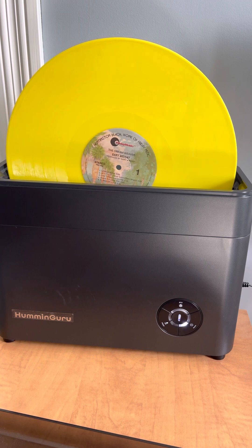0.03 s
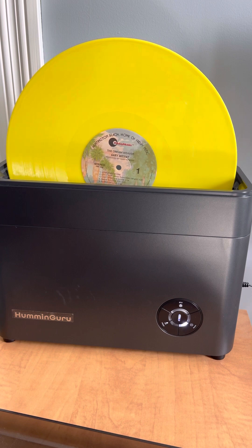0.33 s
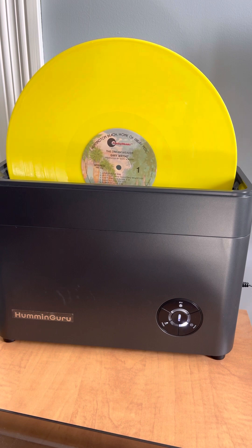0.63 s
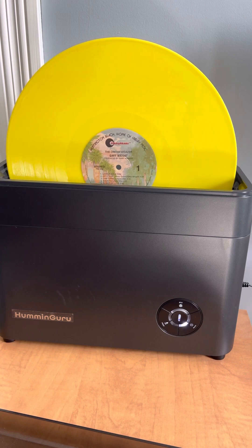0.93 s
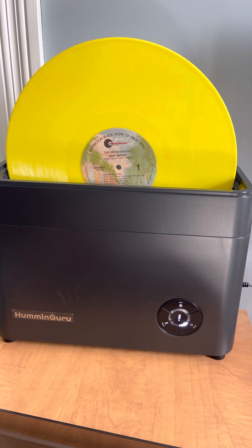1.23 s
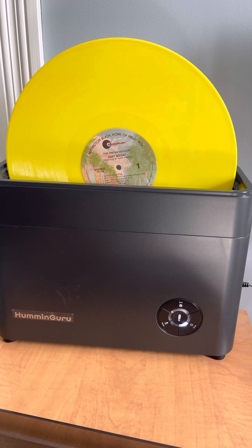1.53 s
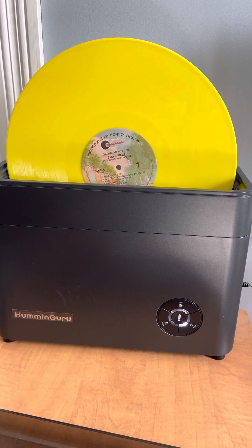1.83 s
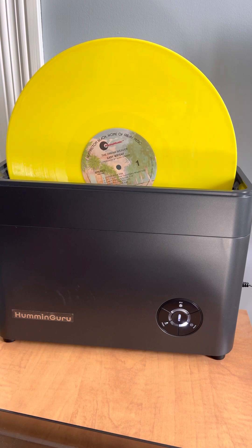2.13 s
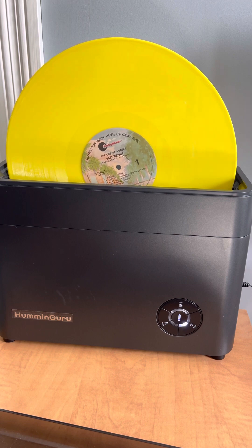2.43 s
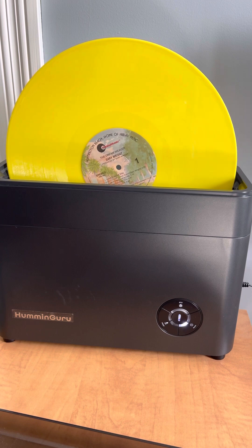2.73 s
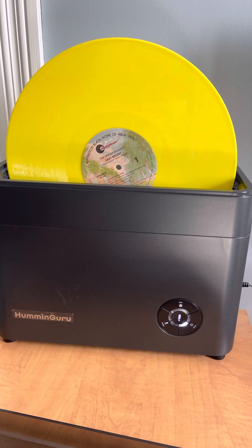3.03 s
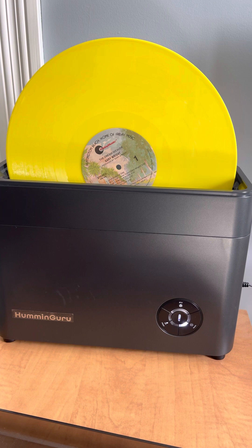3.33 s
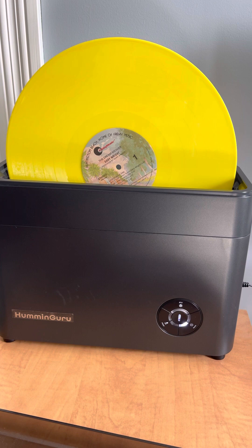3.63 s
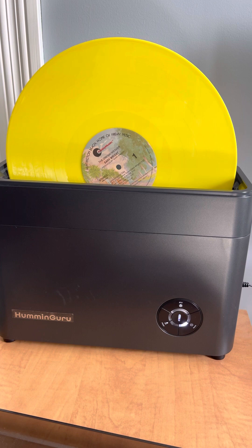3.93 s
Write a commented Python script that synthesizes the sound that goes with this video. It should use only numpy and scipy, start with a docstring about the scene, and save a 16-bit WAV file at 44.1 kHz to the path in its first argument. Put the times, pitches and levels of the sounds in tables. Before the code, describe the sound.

An ultrasonic record cleaner hisses and sizzles over a faint motor hum.

```python
"""Cavitation in the water bath of an ultrasonic record cleaner, close to two microphones in a quiet room.
Collapsing bubbles hiss and break into spells of sizzling that ring the tank, with one bright spit.
The stirred water gurgles faintly. A small motor hums at a slightly wavering speed
over a soft rush of air through the housing."""
import sys
import numpy as np
from scipy import signal
from scipy.fft import rfft, irfft
from scipy.io import wavfile

SR = 44100
rng = np.random.default_rng(int(sys.argv[2]) if len(sys.argv) > 2 else 0)


def digitize_waveform(pressure):
    """Quantize a signal to 16-bit integers and store it at the path in sys.argv[1].

    Rows of a 2-D input are taken as channels; values are limited to [-1, 1].
    """
    field = np.atleast_2d(pressure).T
    bounded = np.clip(field, -1, 1)
    quanta = np.round(bounded * 32767).astype(np.int16)
    wavfile.write(sys.argv[1], SR, quanta)


N = 176400
TIME_S = np.arange(N) / SR
FREQ_HZ = np.fft.rfftfreq(N, 1 / SR)


# Cavitation spectrum: f/Hz, relative level/dB
HISS_SPECTRUM = [(2000, -125), (4000, -106), (4900, -94), (5600, -88.3), (6500, -89), (7300, -86.5),
                 (8000, -84), (8500, -83), (8900, -81), (9300, -80), (10400, -76.3), (11000, -77.2),
                 (11700, -79), (12500, -82.3), (13300, -89), (14300, -97.5), (15000, -100), (15600, -95)]

def hiss(lift_db, level_db=-41, growth_db_per_s=.33, swell_db=.46):
    """A steady, slightly restless cloud of collapsing bubbles."""
    envelope_db = growth_db_per_s * TIME_S + swell_db * wander(rate_hz=24) + lulls()
    drive = collapses(per_s=28000) * amp(envelope_db)
    return amp(level_db) * radiate(drive, HISS_SPECTRUM, lift_db)


# Sizzling spells: start t/s, length/s, relative level/dB
SIZZLE_SPELLS = [(0.24, 0.12, 1.3), (0.47, 0.15, -2.2), (0.667, 0.016, 11), (0.69, 0.02, 4.2),
                 (0.735, 0.085, 0.8), (0.845, 0.02, 5.5), (0.885, 0.022, 3.2), (0.955, 0.027, 3.5),
                 (1.005, 0.032, 3.8), (1.135, 0.025, 2.8), (1.19, 0.065, 1.8), (1.275, 0.065, 3.6),
                 (1.39, 0.21, -1), (1.615, 0.06, 2), (1.722, 0.025, 2), (1.81, 0.14, 2), (2.165, 0.095, 1),
                 (2.29, 0.17, -.5), (2.69, 0.025, 0), (2.722, 0.03, 4.6), (2.84, 0.07, 2), (2.93, 0.11, 0),
                 (3.09, 0.23, .3), (3.45, 0.17, 1), (3.63, 0.18, -.4)]
# Sizzle spectrum: f/Hz, relative level/dB
SIZZLE_SPECTRUM = [(6000, -46), (7500, -23), (7950, -16), (8400, -16.5), (8570, -9), (8720, 0), (8900, 0),
                   (9100, -4), (9260, -9), (9450, -6), (9700, -11.5), (10500, -18), (12000, -29),
                   (14000, -44)]

def sizzle(lift_db, level_db=-43.9, idle_db=-11, attack_s=.008, release_s=.012):
    """Bubble clusters flare up, flutter and die away."""
    envelope = amp(idle_db + lulls())
    for start, length, db in SIZZLE_SPELLS:
        attack = np.clip((TIME_S - start) / attack_s + .5, 0, 1)
        release = np.exp(-np.maximum(TIME_S - start - length, 0) / release_s)
        envelope = np.maximum(envelope, amp(db) * attack * release)
    clicks = collapses(per_s=18000)
    flutter_db = 2.2 * np.clip(wander(rate_hz=70), -2, 1)
    return amp(level_db) * radiate(clicks * envelope * amp(flutter_db), SIZZLE_SPECTRUM, lift_db)


# Spit spectrum: f/Hz, relative level/dB
SPIT_SPECTRUM = [(7000, -40), (7900, -18), (8200, -3), (8600, 0), (9300, -4), (10300, -5), (11000, -14),
                 (13000, -40)]

def spit(centre_s=1.706, length_s=.034, level_db=-41, pulse_hz=115, pulse_depth=.3):
    """One bright bubble cluster bursts straight ahead in a few quick pulses."""
    t = TIME_S - centre_s
    pulses = 1 + pulse_depth * np.cos(2 * np.pi * pulse_hz * t)
    cluster = radiate(collapses(per_s=20000), SPIT_SPECTRUM, lift_db=0, aside=0)
    return amp(level_db) * bump(centre_s, length_s) * pulses * cluster


def collapses(per_s):
    """Two trains of clicks from collapsing bubbles, at the same instants with separate random strengths."""
    return rng.standard_normal((2, N)) * (rng.random(N) < per_s / SR)


# Cavitation lulls: centre t/s, length/s, gain/dB
CAVITATION_LULLS = [(.12, .2, -1), (1.09, .09, -2), (2.06, .07, -1.5), (3.385, .09, -2.6),
                    (3.92, .16, -1.6)]

def lulls():
    """Gain in dB as the cavitation briefly slackens."""
    return sum(db * bump(centre, length) for centre, length, db in CAVITATION_LULLS)


# Tank modes: f/Hz, lift/dB
TANK_MODES = [(8748, 6.5), (8840, 4.5), (9040, 3), (9130, 4), (9232, 3.5), (9485, 4.5), (9722, 7),
              (9925, 3), (10029, 3.5), (10172, 3), (10476, 3.5), (10637, 4.5), (10893, 5.5), (11027, 5.5),
              (11322, 3), (11535, 2.5), (11890, 4), (11989, 3), (12096, 2.5), (12190, 3), (12297, 3.5),
              (12543, 4.5)]

def tank():
    """Lift in dB from the ringing water tank."""
    return resonances(TANK_MODES, half_width_hz=24)


# Bubble families: f/Hz, spread/Hz, level/dB
BUBBLE_FAMILIES = [(1050, 86, -71), (1650, 82, -70), (2129, 190, -72)]

def water(chirp_db=-60.5):
    """Stirred water gurgles faintly, with one short chirp."""
    burble = sum(amp(db) * gurgles(hz, spread) for hz, spread, db in BUBBLE_FAMILIES)
    chirp = noise_band(centre_hz=1430, width_hz=270) * bump(centre_s=.095, length_s=.14)
    return burble + amp(chirp_db) * chirp


def gurgles(centre_hz, spread_hz, per_s=75, decay_s=.0055, rise_per_s=1.5, range_db=10):
    """Small bubbles ring near one pitch; each swells, glides up a little and dies."""
    t = np.arange(0, 8 * decay_s, 1 / SR)
    envelope = t * np.exp(-t / decay_s)
    glide = 1 + rise_per_s * (t - decay_s)
    bubbles = np.zeros(N + len(t))
    for when, pitch, faintness in rng.random((round(per_s * N / SR), 3)):
        ring_hz = centre_hz + spread_hz * np.log((pitch + .01) / (1.01 - pitch)) / 2  # logistic scatter
        ring = np.sin(2 * np.pi * np.cumsum(ring_hz * glide) / SR)
        start = int(when * N)
        bubbles[start:start + len(t)] += amp(-range_db * faintness) * envelope * ring
    return unit_rms(bubbles[:N])


# Main motor tone: t/s, f/Hz
MOTOR_PITCH = [(0, 691.2), (0.2, 692.9), (0.35, 692.1), (0.55, 694.4), (0.7, 692.9), (0.95, 688.3),
               (1.05, 690.5), (1.2, 687.6), (1.5, 693.2), (1.8, 695.2), (2.15, 690.8), (2.25, 686.4),
               (2.36, 690.6), (2.55, 688.0), (2.78, 692.9), (2.95, 692.4), (3.17, 694.7), (3.55, 688.2),
               (4, 689.0)]
# Motor harmonics: multiple of turning rate, level/dB, left lead/rad
MOTOR_HARMONICS = [(3, -60.3, -0.7), (6, -86, 0.1), (9, -84.5, -2.4), (12, -77, -2)]
# Once-a-turn hum: t/s, level/dB
ROTOR_HUM = [(0, -84), (.45, -85.5), (.56, -78.5), (.82, -80.5), (.95, -89), (1.4, -87), (1.75, -79.5),
             (2.02, -80), (2.15, -86.5), (2.7, -87), (3.15, -77.5), (3.48, -78.5), (3.58, -83.5),
             (4, -85.5)]

def motor(main_order=3, jitter_hz=.78, waver_db=.25, mains_hz=119, mains_db=-92.5):
    """Tones at multiples of the turning rate, a swelling low hum and a trace of mains hum."""
    pitch_hz = np.interp(TIME_S, *np.transpose(MOTOR_PITCH)) + jitter_hz * wander(rate_hz=13)
    angle = 2 * np.pi * np.cumsum(pitch_hz) / SR / main_order
    side = np.array([[.5], [-.5]])
    tones = sum(amp(db) * np.sin(order * angle + side * lead) for order, db, lead in MOTOR_HARMONICS)
    tones *= amp(waver_db * wander(rate_hz=7.2))
    hum = amp(np.interp(TIME_S, *np.transpose(ROTOR_HUM))) * np.sin(angle)
    mains = amp(mains_db) * np.sin(2 * np.pi * mains_hz * TIME_S)
    return np.sqrt(2) * (tones + hum + mains)


# Air and room floor spectrum: f/Hz, relative level/dB
AIR_SPECTRUM = [(20, -122.6), (40, -114.9), (62, -105.9), (120, -104.5), (190, -109), (400, -105.5),
                (600, -101.5), (760, -93), (900, -99), (1030, -91.5), (1150, -92), (1300, -100.5),
                (1520, -91.5), (1680, -88.5), (1850, -96), (2100, -93), (2500, -95.5), (3300, -97),
                (3700, -95), (3950, -88.5), (4400, -93), (6000, -105), (12000, -125)]

def air(lift_db, level_db=-59, growth_db_per_s=.49, swell_db=1.2):
    """A soft rush of air, slowly growing."""
    envelope_db = growth_db_per_s * TIME_S + swell_db * wander(rate_hz=22)
    drive = rng.standard_normal((2, N)) * amp(envelope_db)
    return amp(level_db) * radiate(drive, AIR_SPECTRUM, lift_db)


# Housing modes: f/Hz, lift/dB
HOUSING_MODES = [(290, 6), (460, 2.5), (760, 3), (823, 5.5), (995, 6.5), (1384, 7), (1728, 6), (1858, 4),
                 (2067, 5), (2772, 9)]

def housing():
    """Lift in dB from the resonating housing."""
    return resonances(HOUSING_MODES, half_width_hz=5.9)


def reflections(ripple_db=2, spacing_hz=30):
    """Fine spectral ripple in dB from the desk and walls."""
    knots_hz = np.arange(0, SR / 2, spacing_hz)
    return ripple_db * np.interp(FREQ_HZ, knots_hz, rng.standard_normal(len(knots_hz)))


# Likeness of the two microphones: f/Hz, coherence
MIC_COHERENCE = [(40, .98), (130, 0.91), (280, 0.39), (600, 0.11), (850, 0.36), (1100, 0.83), (1450, 1),
                 (2300, 1), (2800, .95), (3600, .86), (4500, .62), (5300, .7), (5750, 1), (6400, 1),
                 (7100, .68), (8200, .86), (8700, .99), (9400, 1), (9900, .92), (11600, .92), (12100, .99),
                 (13300, .98), (14400, .6), (15300, .85)]
# Earlier arrival at the left microphone: f/Hz, lead/rad
LEFT_LEAD = [(20, 0), (2400, 0), (3700, .15), (4300, 1), (4900, 3.2), (5250, 5.4), (5750, 6.28),
             (6450, 6.35), (7400, 7.8), (8400, 9.2), (8800, 9.3), (9500, 9.45), (9750, 9.95), (11000, 11.1),
             (11650, 11.7), (11900, 12.4), (12200, 12.55), (13800, 12.6), (14300, 13.1), (14600, 15.7)]

def radiate(drive, spectrum, lift_db, aside=1):
    """Colours two uncorrelated drives and blends them into stereo, rms 1; aside=0 is straight ahead."""
    first, second = rfft(drive) * amp(log_curve(spectrum) + lift_db)
    coherence = log_curve(MIC_COHERENCE)
    shared = first * np.sqrt((1 + coherence) / 2)
    apart = second * np.sqrt((1 - coherence) / 2)
    shift = np.exp(.5j * aside * log_curve(LEFT_LEAD))
    return unit_rms(irfft(np.array([(shared + apart) * shift, (shared - apart) / shift]), N))


def resonances(modes, half_width_hz):
    """Summed narrow peaks in dB."""
    return sum(db / (1 + ((FREQ_HZ - hz) / half_width_hz) ** 2) for hz, db in modes)


def noise_band(centre_hz, width_hz):
    """Soft-edged band of noise, rms 1."""
    rolloff = 1 + (2 * (FREQ_HZ - centre_hz) / width_hz) ** 4
    return unit_rms(irfft(rfft(rng.standard_normal(N)) / rolloff, N))


def wander(rate_hz):
    """Zero-mean random drift up to about rate_hz, rms 1."""
    lowpass = (FREQ_HZ > 0) / (1 + (FREQ_HZ / rate_hz) ** 4)
    return unit_rms(irfft(rfft(rng.standard_normal(N)) * lowpass, N))


def bump(centre_s, length_s):
    """Gaussian envelope, length_s between its 1/e points."""
    return np.exp(-(2 * (TIME_S - centre_s) / length_s) ** 2)


def log_curve(points):
    """Table interpolated over log frequency."""
    hz, value = np.transpose(points)
    return np.interp(np.log(FREQ_HZ + 1), np.log(hz + 1), value)


def unit_rms(x):
    """Scales to rms 1."""
    return x / np.sqrt(np.mean(x ** 2) + 1e-20)


def amp(db):
    """Decibels to gain."""
    return 10 ** (np.asarray(db) / 20)


def scene():
    """Cavitation over air, water and motor."""
    room_db = reflections()
    bath_db = tank() + room_db
    cavitation = hiss(bath_db) + sizzle(bath_db) + spit()
    return cavitation + air(housing() + room_db) + water() + motor()


def record(dry, cutoff_hz=15700):
    """The recorder's band limit."""
    lowpass = signal.firwin(511, cutoff_hz, window=("kaiser", 9), fs=SR)
    return signal.oaconvolve(dry, lowpass[None], "same")


dry = scene()
out = record(dry)
digitize_waveform(out)
```